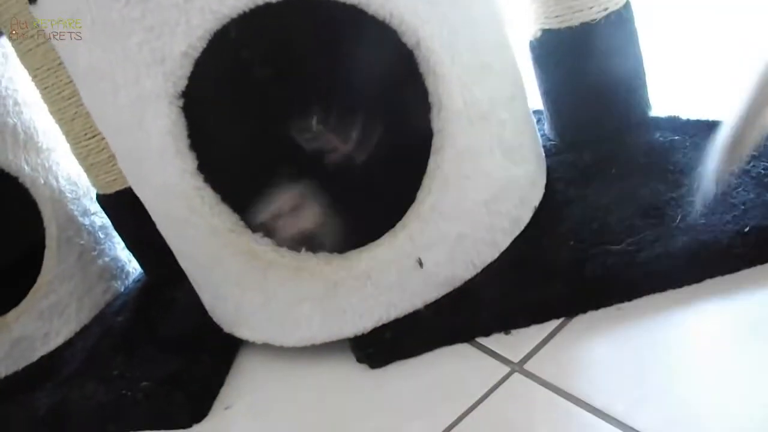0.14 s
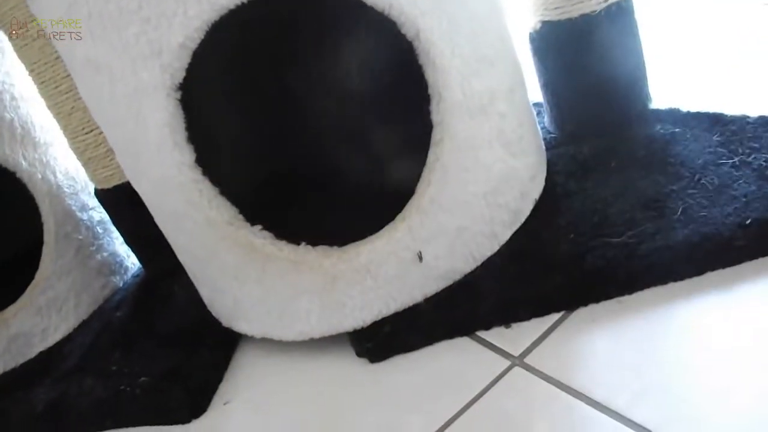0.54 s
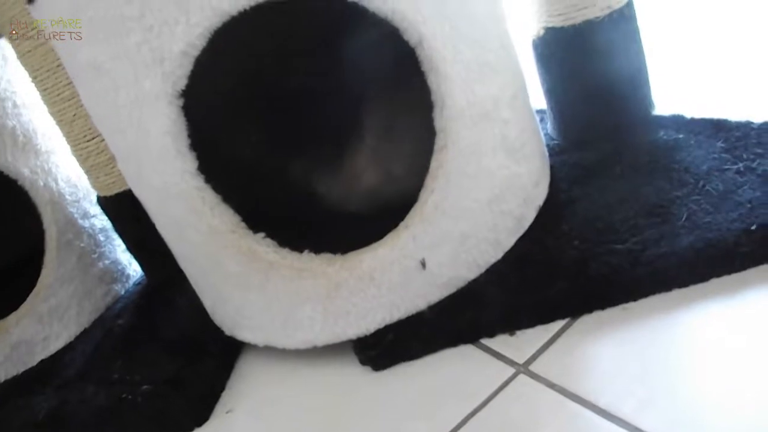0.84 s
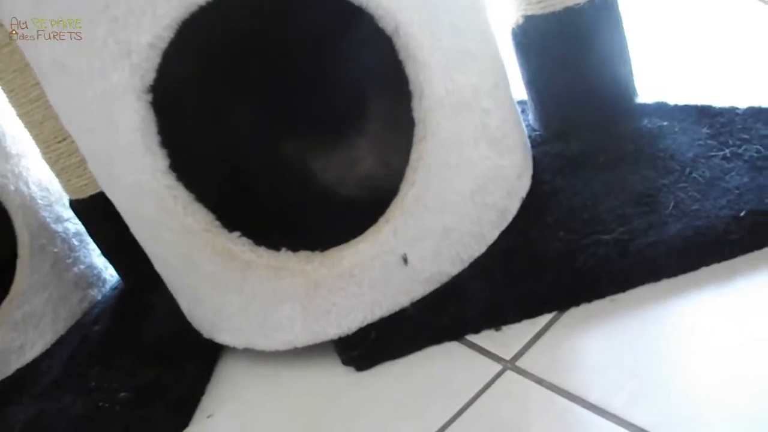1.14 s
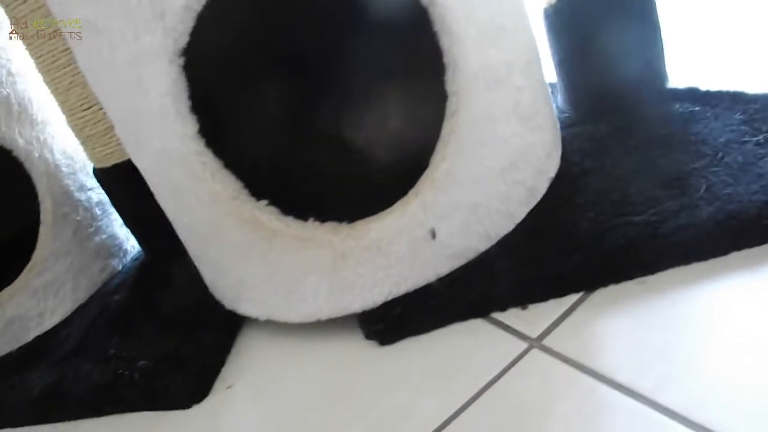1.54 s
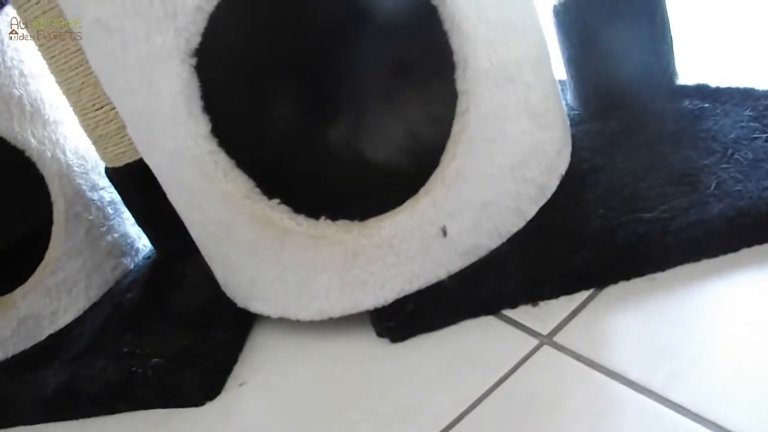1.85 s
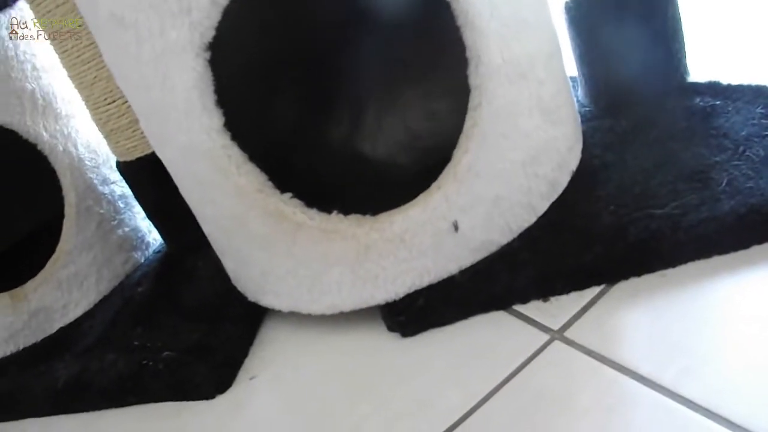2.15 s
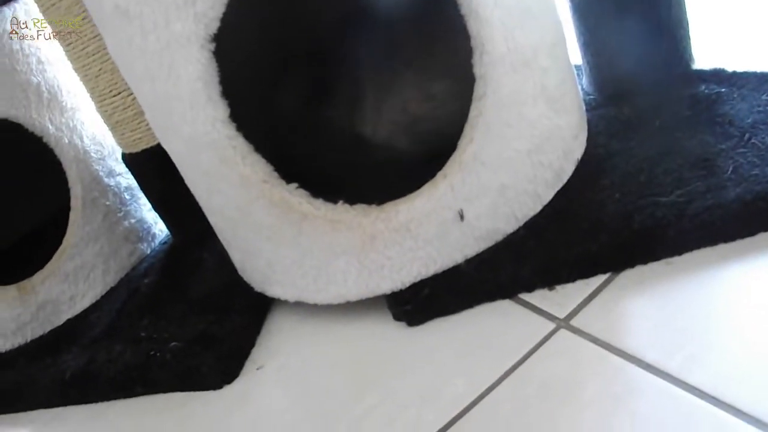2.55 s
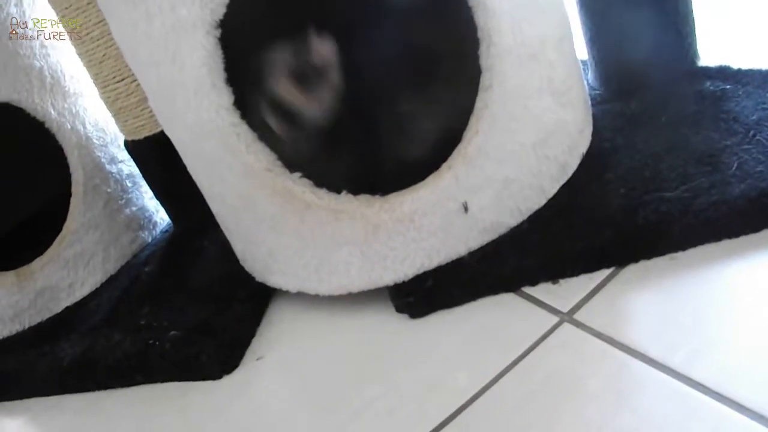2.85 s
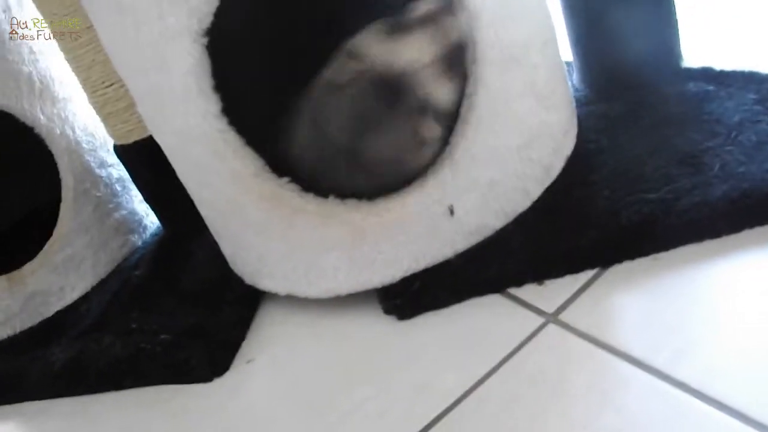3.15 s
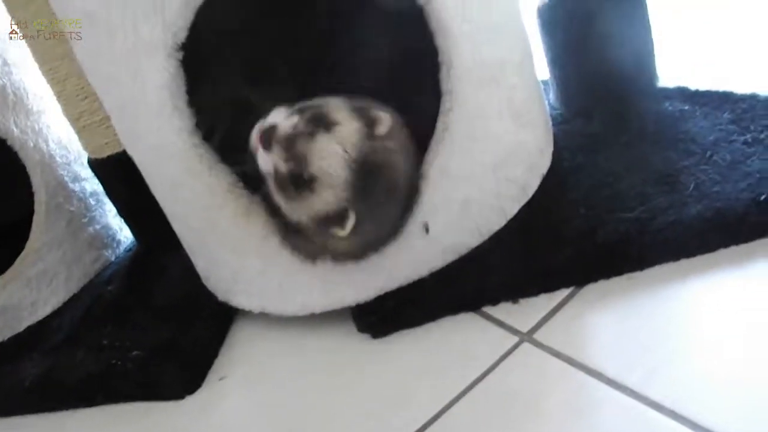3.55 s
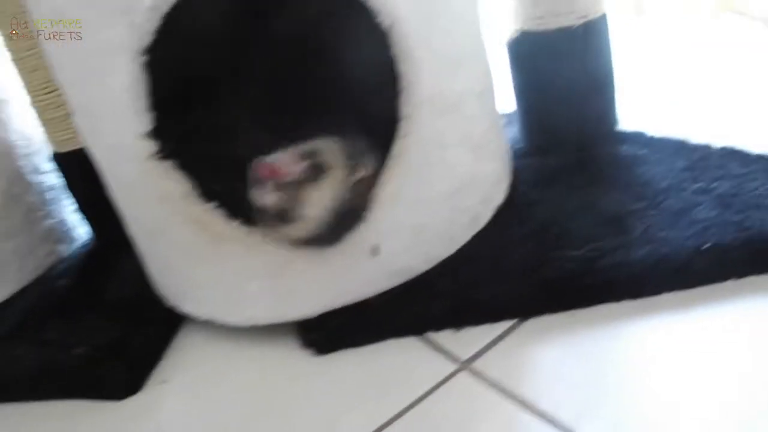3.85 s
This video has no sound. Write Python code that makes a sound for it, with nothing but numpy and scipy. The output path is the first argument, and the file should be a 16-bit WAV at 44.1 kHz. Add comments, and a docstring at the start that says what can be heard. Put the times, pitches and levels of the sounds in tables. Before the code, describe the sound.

A ferret scuffles in a padded box, close up in a quiet, hard room. Claws scrape and thumps sound until 0.4 s; soft paw pats follow to 1 s, with sharp snaps near 0.5, 0.6 and 0.95. A quick scrape comes at 1.47, then sparse ticks, dull thumps and a faint hollow tone. Knocks at 2.9 lead into dense scrabbling and rustling from 3.25, hardest near 3.85. Faint rumble, hiss and thin whine remain.

```python
"""Ferret scuffling in a padded box

A ferret scuffles in a padded cubby on a tiled floor: claws rake the fabric and paws patter on the board.
Bursts of filtered noise make the claws, paws, fur and airy swishes; short dying tones make the thumps,
knocks and small ticks; brief pushes make three sharp snaps. A quiet hard room answers with fading noise.
Behind lie a fuzzy hollow tone that comes and goes, low rumble, room air, faint hiss and a thin high whine.
"""
import sys
import numpy as np
from scipy import signal
from scipy.fft import rfft, irfft, next_fast_len
from scipy.io import wavfile
from scipy.ndimage import uniform_filter1d, map_coordinates

SR = 44100
rng = np.random.default_rng(int(sys.argv[2]) if len(sys.argv) > 2 else 0)


def log_audio(samples):
    """Write samples as a 16-bit WAV file to the path given in sys.argv[1]."""
    # one column per channel
    frames = np.atleast_2d(samples).T
    # limit to full scale, then quantise
    limited = np.clip(frames, -1, 1)
    pcm = np.round(limited * 32767).astype(np.int16)
    wavfile.write(sys.argv[1], SR, pcm)


def volts(x):
    """Linear amplitude factor 10**(x/20) for a level x in dB, scalar or array-like."""
    e = np.asarray(x, float) / 20
    return 10 ** e


N = 176400  # samples: 4 seconds

# Event levels are relative settings; filters and mixing gains come later.
# claw rakes: (time [s], level [dB], fall time [s], hollow part against claw part [dB])
CLAW_RAKES = [(0.182, -33, 0.036, -38.5), (0.223, -25, 0.058, -9.5), (0.235, -20.5, 0.014, -32),
              (0.298, -40.5, 0.0091, -9.5), (0.334, -42, 0.018, -6.5), (1.447, -56, 0.03, 5),
              (1.461, -22, 0.0091, -3.5), (1.469, -17, 0.018, -4.5), (3.048, -45, 0.021, -6.5),
              (3.072, -37, 0.098, -7.5), (3.2566, -26, 0.025, 5.5), (3.274, -38, 0.041, -13.5),
              (3.431, -32.5, 0.047, -1.5), (3.444, -24.5, 0.016, 6), (3.5463, -23, 0.013, 7),
              (3.5554, -18.5, 0.016, -3), (3.5678, -20, 0.027, -3), (3.595, -32, 0.0096, -15),
              (3.6236, -24, 0.032, -12.5), (3.652, -30, 0.059, -2.5), (3.726, -35, 0.046, -3),
              (3.812, -23.5, 0.019, -4.5), (3.8462, -13.5, 0.018, -1), (3.8586, -22, 0.012, -8),
              (3.864, -17, 0.025, -21), (3.879, -21, 0.024, -27.5), (3.978, -16, 0.0082, -9.5)]
# resonances of the claws on fabric: (centre [Hz], width [Hz], level [dB])
CLAW_PEAKS = [(2450, 210, 1.5), (2845, 1040, 15.5), (4200, 700, -30.5)]
# resonances of the hollow box: (centre [Hz], width [Hz], level [dB])
HOLLOW_PEAKS = [(1400, 675, 0.5), (1652, 390, -2.5), (650, 121, -1), (1940, 140, -12)]
# paw pats on the board: (time [s], level [dB], fall time [s])
PAW_PATS = [(0.528, -33.5, 0.02), (0.628, -32, 0.021), (0.641, -41.5, 0.032), (0.729, -35, 0.012),
            (0.827, -37, 0.026), (0.898, -34, 0.017), (0.94, -35.5, 0.03)]
# resonances of the board: (centre [Hz], width [Hz], level [dB])
BOARD_PEAKS = [(280.8, 236, 2), (479, 400, 1), (768, 270, 0), (1003, 180, 5.5), (1400, 43, -9.5),
               (2130, 320, -8)]
# soft pads and fur make little treble: (frequency [Hz], gain [dB])
PAW_SOFTNESS = [(2300, 2), (2900, -10), (3400, -22.5), (4500, -42)]
# hard knocks that ring the box: (time [s], level [dB], pitch [Hz], time to die by 60 dB [s])
HARD_KNOCKS = [(2.931, -22.5, 1645, 0.017), (3.083, -26, 2450, 0.061), (3.2575, -15.5, 1459, 0.055),
               (3.272, -21.5, 2900, 0.055), (3.433, -14.5, 1400, 0.041), (3.434, -26.5, 1960, 0.03),
               (3.556, -14.5, 1453, 0.071), (3.814, -19.5, 2223, 0.071), (3.815, -21, 1412, 0.065),
               (3.847, -6.5, 2450, 0.033), (3.858, -7, 3277, 0.026), (3.98, -14.5, 2960, 0.031)]
# thumps of the box: (time [s], level [dB], pitch [Hz], time to die by 60 dB [s])
BOX_THUMPS = [(0.037, -25.5, 335, 0.064), (0.092, -24.5, 343, 0.024), (0.176, -41.5, 185, 0.17),
              (0.319, -43.5, 173, 0.13), (0.519, -49, 300, 0.014), (0.626, -29, 314.4, 0.066),
              (0.942, -26, 178.6, 0.045), (0.997, -37.5, 151, 0.033), (1.483, -29, 203, 0.098),
              (1.637, -59, 190, 0.038), (1.77, -39, 170, 0.053), (1.878, -31.5, 191, 0.077),
              (2.932, -39.5, 184.5, 0.15), (3.268, -28.5, 237.5, 0.058), (3.446, -35.5, 214, 0.24),
              (3.544, -32, 362, 0.11), (3.59, -33.5, 169.3, 0.11), (3.663, -30.5, 328, 0.078),
              (3.742, -36, 331, 0.12), (3.814, -20, 345.4, 0.078), (3.89, -35.5, 333, 0.15)]
# small ticks with their own pitch: (time [s], level [dB], pitch [Hz], time to die by 60 dB [s])
SMALL_TICKS = [(.118, -40.5, 2900, 0.087), (.118, -46.5, 4570, 0.032), (.166, -41, 1750, 0.16),
               (.183, -30, 1886, 0.053), (.245, -40, 7350, 0.059), (.376, -36, 2430, 0.03),
               (.427, -28, 6780, 0.016), (.48, -62.5, 650, 0.66), (.99, -46, 1198, 0.2),
               (1.0, -56, 4360, 0.074), (1.023, -28.5, 4200, 0.034), (1.04, -41.5, 4200, 0.026),
               (1.05, -44.5, 1204, 0.17), (1.085, -57, 3040, 0.18), (1.111, -35.5, 1274, 0.031),
               (1.468, -46, 8560, 0.05), (1.47, -46, 9400, 0.04), (1.802, -35, 3650, 0.037),
               (1.823, -36, 3448, 0.068), (1.885, -46.5, 4200, 0.084), (1.93, -52.5, 621, 0.2),
               (2.078, -43.5, 1196, 0.19), (2.08, -46.5, 4300, 0.062), (2.08, -49, 2371, 0.29),
               (2.21, -54.5, 1253, 0.19), (2.23, -58.5, 4230, 0.056), (2.33, -67.5, 4730, 0.53),
               (2.385, -52, 4780, 0.065), (2.43, -63, 4840, 0.1), (.19, -56, 9200, 0.053),
               (.19, -55, 8000, 0.032), (.452, -56, 6200, 0.019), (1.04, -62, 3650, 0.21),
               (2.402, -60, 1252, 0.11), (2.514, -46, 1757, 0.083), (2.618, -52, 1746, 0.061),
               (2.68, -56, 1760, 0.13), (2.69, -54, 700, 0.053), (2.825, -49.5, 1272, 0.3),
               (2.835, -19.5, 3300, 0.028), (2.84, -62, 3740, 0.069), (2.935, -37, 3970, 0.029),
               (1.762, -41, 920, 0.056), (1.765, -31, 1041, 0.072), (2.83, -47, 1824, 0.082),
               (2.84, -63, 840, 0.043), (3.0, -56, 741, 0.14), (3.1, -37, 1665, 0.053),
               (1.778, -35, 1285, 0.069), (1.78, -40, 1676, 0.058), (2.735, -58.5, 1740, 0.062),
               (3.235, -40.5, 1626, .08), (.46, -52, 205, 0.087), (3.052, -43, 1056, 0.14),
               (3.085, -30.5, 1223, 0.069)]
# sharp knocks close to the microphone: (time [s], level [dB])
CLOSE_SNAPS = [(0.5235, -24), (0.6302, -30.5), (0.9526, -22.5)]
# fur on fabric: (time [s], level [dB], hollow part against it [dB], upper part against it [dB])
FUR_RUSTLE = [(0.0, -47, -9, -1.5), (0.17, -60, -2, -8), (0.26, -45, -13.5, 20.5), (0.29, -49, -18, 4),
              (0.42, -64.5, -10, -2), (0.77, -64, 5.5, -42), (0.92, -64, 0.5, -31), (1.04, -58.5, 3.5, 0.5),
              (1.21, -108, -25, -20), (1.43, -86, -10, -18), (1.47, -91, 37, 40.5),
              (1.63, -51.5, -7.5, -3.5), (1.77, -71, 0, 2.5), (1.83, -71.5, 9, 18), (2.03, -65.5, 1.5, 0.5),
              (2.42, -71.5, -13.5, 1.5), (2.8, -71, -0.5, 3), (2.83, -66.5, -4, 10.5),
              (3.12, -61, -5, -13.5), (3.23, -55.5, -5, -1.5), (3.26, -41.5, -8, -10),
              (3.41, -53, -3.5, -3), (3.44, -49.5, 4, -11), (3.53, -45, -15, -21), (3.55, -34, -2.5, -6),
              (3.65, -40, -7, 8), (3.78, -47.5, -4, 2.5), (3.88, -31, -6.5, 7.5), (3.92, -37, -14.5, -6.5),
              (4.0, -35.5, -3.5, -1)]
# resonances of the fur: (centre [Hz], width [Hz], level [dB])
FUR_PEAKS = [(2270, 820, -9.5), (2617, 310, 6.5), (2900, 350, -3.5)]
# resonances of the upper part of the rustle: (centre [Hz], width [Hz], level [dB])
UPPER_PEAKS = [(3983, 400, -3), (4300, 430, -0.6), (4740, 1800, -3)]
# airy swishes of fur and fabric: (time [s], level [dB], fall time [s])
FUR_SWISHES = [(0.0094, -58.5, 0.038), (0.179, -54, 0.03), (0.224, -44, 0.022), (0.2347, -38, 0.022),
               (0.298, -72.5, 0.028), (0.327, -60.5, 0.018), (0.364, -60, 0.022), (0.423, -71, 0.0073),
               (0.944, -72, 0.01), (1.4662, -36.5, 0.012), (1.4708, -21.5, 0.017), (2.525, -57, 0.034),
               (2.71, -62.5, 0.033), (3.2636, -53, 0.018), (3.27, -48, 0.024), (3.435, -55, 0.047),
               (3.437, -42.5, 0.019), (3.54, -46.5, 0.02), (3.5575, -35, 0.037), (3.6175, -34, 0.042),
               (3.631, -45, 0.13), (3.668, -46.5, 0.021), (3.719, -53, 0.061), (3.8144, -46, 0.051),
               (3.8456, -26.5, 0.034), (3.871, -39, 0.033), (3.876, -33.5, 0.031), (3.926, -42, 0.056)]
# claw tips ticking on the rim: (time [s], level [dB])
CLAW_TIPS = [(0.031, -61), (0.064, -51), (0.099, -59), (.159, -59.5), (0.192, -61), (.319, -50),
             (.351, -57), (.366, -59.5), (.398, -61), (.429, -48), (2.095, -68), (3.45, -60),
             (3.471, -53.5), (3.731, -44.5), (3.926, -51), (3.9811, -36)]
# treble colour of swishes and claw tips: (frequency [Hz], level per Hz [dB])
SWISH_COLOUR = [(2500, -34.5), (3800, 5), (5000, 0.5), (6000, -2), (7500, -4.5), (9300, -9.5), (10200, -23),
                (11000, -29.5), (12500, -54.5), (15500, -63)]
# wide thin cracks and their hiss: (time [s], level [dB], fall time [s])
THIN_CRACKS = [(0.0, -77.5, 0.19), (0.43, -77, 0.15), (0.523, -60, 0.0024), (0.53, -77, 0.11),
               (0.94, -72, 0.13), (0.9515, -56, 0.003), (1.468, -54, 0.018), (1.49, -68, 0.15),
               (3.28, -75, 0.1), (3.46, -74, 0.07), (3.9805, -54, 0.003)]
# treble colour of the cracks: (frequency [Hz], level per Hz [dB])
CRACK_COLOUR = [(3000, -24), (5000, 1), (6800, -6), (8800, 0.5), (11000, -10), (13000, -17.5),
                (15800, -23.5)]
# two spells of a hollow tone: (time [s], pitch [Hz], level [dB])
HOLLOW_TONE = [
    [(1.88, 593, -77), (1.916, 564, -64), (1.934, 626, -54), (1.986, 532, -72), (2.014, 585, -58),
     (2.028, 572, -83), (2.176, 587, -53), (2.286, 582, -73), (2.306, 581, -55.5), (2.416, 546, -66.5),
     (2.43, 550, -95), (2.45, 561, -59), (2.508, 525, -91), (2.56, 511.3, -75.5)],
    [(2.72, 605, -101), (2.73, 595, -106), (2.742, 525, -83), (2.752, 546, -65.5), (2.802, 514, -84),
     (2.846, 544, -55.5), (2.872, 533, -69), (2.886, 560, -76), (2.904, 545.8, -56), (2.96, 536, -82),
     (2.982, 535, -68), (2.996, 494, -85.5), (3.008, 525.2, -74), (3.02, 556, -81)],
]
# padding dulls the nearby sounds: (frequency [Hz], gain [dB])
PADDING = [(3200, 0), (3800, -8), (4500, -14), (6000, -28), (10000, -42), (16000, -60)]
# how long the room rings: (frequency [Hz], time to die by 60 dB [s])
ROOM_DECAY = [(100, 1), (500, 0.58), (1500, 0.41), (3000, 0.54), (6000, 0.48), (10000, 0.8)]
# colour of the room air: (frequency [Hz], level per Hz [dB])
AIR_COLOUR = [(53, -12.5), (90, -9), (163, 0), (228, -6), (268, -10), (300, -27), (358, -15), (921, -41),
              (1210, -14.5), (1990, -8), (2450, -5), (2790, -1.5), (3120, -25), (4160, -24), (5410, -49),
              (9150, -120)]
# loudness path of the rumble: (time [s], level [dB])
RUMBLE_LEVEL = [(0.0, -51.5), (0.08, -75), (0.1, -39.5), (0.19, -59), (0.86, -86), (0.91, -91), (0.95, -44),
                (1.26, -93), (1.53, -58.5), (1.83, -67), (2.0, -55), (2.07, -65), (2.57, -68),
                (2.61, -57.5), (3.52, -54.5), (3.55, -47.5), (3.82, -71), (4.0, -50.5)]
# colour of the rumble: (frequency [Hz], level per Hz [dB])
RUMBLE_COLOUR = [(8.8, -35.5), (15, -1.5), (65, -11), (78, -20), (97, -64), (130, -20), (170, -51),
                 (290, -120)]
# threshold of the noise suppressor: (frequency [Hz], level per frequency bin [dB])
SUPPRESSOR_THRESHOLD = [(100, -105), (1000, -100), (3000, -93), (4500, -101), (6000, -93.5), (10000, -100),
                        (14000, -112)]
# colour of the electronic hiss: (frequency [Hz], level per Hz [dB])
HISS_COLOUR = [(3000, -37), (5000, 2), (10000, -1), (13000, -4), (15500, -6.5)]


def unit(x):
    """Scale a sound to an average strength (rms) of 1."""
    return x / np.sqrt(np.mean(x ** 2) + 1e-20)


def along(points, hz):
    """Read a (frequency, value) curve, with frequency on a log axis."""
    f, v = np.transpose(points)
    return np.interp(np.log(hz + 1), np.log(f + 1), v)


def curves(rows):
    """Give one value per sample for each column after the time."""
    s, *columns = np.transpose(rows)
    return [np.interp(np.arange(N) / SR, s, column) for column in columns]


def wobble(rate):
    """Make a smooth random curve with this many knots a second."""
    return map_coordinates(rng.standard_normal(400), [np.arange(N) * rate / SR], mode="wrap")


def filtered(x, response):
    """Multiply the spectrum of x by a response that depends on frequency."""
    m = next_fast_len(N + SR // 2)
    return irfft(rfft(x, m) * response(np.fft.rfftfreq(m, 1 / SR)), m)[:N]


def colored(x, points):
    """Shape the spectrum of x with a (frequency, dB) curve."""
    return filtered(x, lambda f: volts(along(points, f)))


def body(x, peaks):
    """Pass x through steep resonances, scaled so that white noise keeps its rms."""
    def shape(f):
        total = 0
        for center, width, db in peaks:
            single = 1j * f * width / (center * center - f * f + 1j * f * width)
            total = total + volts(db) * single ** 2
        return total
    freqs = np.linspace(1, SR / 2, num=2000)
    return filtered(x, shape) / np.sqrt(np.mean(abs(shape(freqs)) ** 2))


def grit(rough_db):
    """Make noise of rms 1 from uneven grains, each 40 samples long."""
    grain_db = rough_db * np.repeat(rng.standard_normal(N // 40 + 1), 40)[:N]
    return unit(rng.standard_normal(N) * volts(grain_db))


def strokes(rows, rise_s):
    """Draw a loudness outline from (time, dB, fall time) rows: a quick rise, then a rounded fall."""
    t, out = np.arange(N) / SR, np.zeros(N)
    for s, db, fall_s in rows:
        since = np.clip(t - s, 0, None)
        rise = np.clip((t - s) / rise_s + 0.5, 0, 1)
        out += volts(db) * rise * np.exp(-(since / fall_s) ** 2)
    return out


def rings(rows, attack_s, rough):
    """Add damped tones with smoothly wandering phase, each at most a quarter second long."""
    out, t = np.zeros(N + SR), np.arange(SR // 4) / SR
    for s, db, hz, t60 in rows:
        # higher tones wander faster
        drift = rough * map_coordinates(rng.standard_normal(200), [t * np.sqrt(hz) * 9], mode="wrap")
        loudness = volts(db - 60 * t / t60) * (1 - np.exp(-t / attack_s)) ** 2
        out[round(s * SR):][:len(t)] += loudness * np.sin(2 * np.pi * hz * t + drift)
    return out[:N]


def rakes():
    """Claws catch the fabric in bursts of grains that ring the claw band and the hollow box."""
    s, db, fall_s, hollow_db = np.transpose(CLAW_RAKES)

    def part(extra_db, peaks):
        outline = strokes(np.c_[s, db + extra_db - 9, fall_s], rise_s=0.0071)
        return body(outline * grit(rough_db=3.0), peaks)
    return part(0, CLAW_PEAKS) + part(hollow_db, HOLLOW_PEAKS)


def pats():
    """Padded paws strike the board: noise bursts ring it, and the soft pads weaken the treble."""
    bursts = strokes(PAW_PATS, rise_s=0.006) * grit(rough_db=2.5)
    return colored(volts(-9) * body(bursts, BOARD_PEAKS), PAW_SOFTNESS)


def knocks():
    """Hard knocks ring the box as fast-starting, quickly dying tones."""
    return rings(HARD_KNOCKS, attack_s=0.001, rough=0.89)


def thumps():
    """The box thumps in low tones that die away."""
    return rings(BOX_THUMPS, attack_s=0.0021, rough=0.73)


def ticks():
    """Small parts tick with damped tones, each at its own pitch."""
    return volts(4.0) * rings(SMALL_TICKS, attack_s=0.0055, rough=1.036)


def snaps():
    """Each snap is one short push: a soft swing one way, then a sharp dying swing the other way."""
    t, out = np.arange(N) / SR, np.zeros(N)
    for (s, db), sign in zip(CLOSE_SNAPS, [1, -1, -1]):
        since = np.clip(t - s, 0, None)
        push = (t > s) * np.exp(-since / 0.0011) * np.cos(2 * np.pi * 300 * since)
        lead = 0.15 * (t <= s) * np.exp(-((t - s) / 0.0063) ** 2)
        out += sign * volts(db) * (push - lead)
    return filtered(out, lambda f: 1 / (1 + 1j * f / 2500) ** 2)  # gentle treble cut


def rustle():
    """Fur rubs on fabric: grainy noise of changing loudness passes through three sets of resonances."""
    level_db, hollow_db, upper_db = curves(FUR_RUSTLE)

    def part(extra_db, peaks):
        flutter_db = 1.7 * wobble(25) + 0.5 * wobble(70)
        return body(volts(level_db + extra_db + flutter_db) * grit(rough_db=3.0), peaks)
    fur = colored(part(0, FUR_PEAKS), PAW_SOFTNESS)
    hollow = part(hollow_db, HOLLOW_PEAKS + BOARD_PEAKS[:2])
    return fur + hollow + part(upper_db, UPPER_PEAKS)


def swishes():
    """Fur, thin cracks and claw tips make bursts of treble noise."""
    freqs = np.linspace(1, SR / 2, num=2000)

    def part(rows, colour, rise_s):
        noise = colored(strokes(rows, rise_s) * grit(rough_db=3.0), colour)
        return noise / np.sqrt(np.mean(volts(along(colour, freqs)) ** 2))
    fur = volts(-12.0) * part(FUR_SWISHES, SWISH_COLOUR, rise_s=0.019)
    cracks = part(THIN_CRACKS, CRACK_COLOUR, rise_s=0.003)
    tip_rows = [(s, db, 0.00084) for s, db in CLAW_TIPS]  # each falls in under a millisecond
    return fur + cracks + part(tip_rows, SWISH_COLOUR, rise_s=0.0006)


def drone():
    """A faint hollow tone comes and goes; its wandering pitch and loudness make it fuzzy."""
    out, t = np.zeros(N), np.arange(N) / SR
    for rows in HOLLOW_TONE:
        hz, db = curves(rows)
        fade = np.clip(np.minimum(t - rows[0][0], rows[-1][0] - t) / 0.037, 0, 1)
        phase = 2 * np.pi * np.cumsum(hz + 8 * wobble(59)) / SR
        out += fade * volts(db + 2.5 + 2.5 * wobble(30)) * np.sin(phase)
    return out


def room(x):
    """The hard room answers with noise tails in which each frequency dies at its own speed."""
    out, hop = np.zeros(N + SR), SR // 4
    for a in range(0, N, hop):  # a new tail for every quarter second
        hz, t, z = signal.stft(rng.standard_normal(SR // 2), SR, nperseg=256)
        decay = volts(-60 * t / along(ROOM_DECAY, hz)[:, None])
        tail = signal.istft(z * decay, SR, nperseg=256)[1]
        answer = signal.fftconvolve(x[a:a + hop], tail / np.linalg.norm(tail))
        out[a + 300:][:len(answer)] += answer  # 300 samples late
    return out[:N]


def background():
    """Room air is steady coloured noise; rumble is low noise that swells in lumps."""
    air = unit(colored(rng.standard_normal(N), AIR_COLOUR))
    low = unit(colored(rng.standard_normal(N), RUMBLE_COLOUR))
    return volts(-75.5) * air + volts(curves(RUMBLE_LEVEL)[0] + 0.61 * wobble(32)) * low


def hiss():
    """Faint electronic hiss is steady noise, mostly treble."""
    return volts(-98) * unit(colored(rng.standard_normal(N), HISS_COLOUR))


def whine():
    """A thin electronic whine with a noisy skirt wavers, and blips once per camera frame."""
    whine_hz, skirt_width_hz = 15691, 120
    frame_s, first_frame_s, blip_s = 1 / 59.94, 0.0042, 0.00016
    t = np.arange(N) / SR
    skirt = unit(filtered(rng.standard_normal(N),
                          lambda f: 1 / (1 + ((f - whine_hz) / skirt_width_hz) ** 2)))
    from_blip = (t - first_frame_s + frame_s / 2) % frame_s - frame_s / 2  # seconds to the nearest blip
    blips = volts(13) * np.exp(-(from_blip / blip_s) ** 2)
    tone = (volts(3.5 * wobble(35)) + blips) * np.sin(2 * np.pi * whine_hz * t)
    return volts(-85) * (tone + volts(-25.5) * skirt)


def suppress(x):
    """A noise suppressor turns down frequency bins whose nearby power is close to or below a threshold."""
    hz, _, z = signal.stft(x, SR, nperseg=512)
    power = uniform_filter1d(abs(z) ** 2, size=5, axis=0)  # smooth over frequency
    power = uniform_filter1d(power, size=5, axis=1)  # then over time
    threshold = volts(2 * along(SUPPRESSOR_THRESHOLD, hz))[:, None]  # doubled dB, because this is power
    gain = np.maximum(power / (abs(power) + threshold), volts(-13))  # never cut by more than 13 dB
    return signal.istft(z * gain, SR, nperseg=512)[1][:N]


def scene():
    """Mix the ferret's sounds, the padding, the room's answers and the background."""
    hits, knock, thump = rakes() + pats(), knocks(), thumps()
    tick, airy = ticks(), swishes()
    answer = room(volts(-11.5) * hits + volts(-10) * knock + volts(-12.0) * thump)
    near = hits + knock + thump + answer + snaps() + rustle() + drone()
    near = colored(near, PADDING)
    bright = tick + room(volts(-12) * tick) + airy + volts(-15.0) * room(airy)
    return (near + bright + background())[None]


def roll_off(x):
    """The treble ends steeply here."""
    return signal.sosfilt(signal.butter(12, 15870, fs=SR, output="sos"), x)


def record(dry):
    """Quieten the weak noise, then add the electronic hiss and whine."""
    mix = suppress(dry[0]) + hiss() + whine()
    return roll_off(mix[None])


dry = scene()
out = record(dry)
log_audio(out)
```